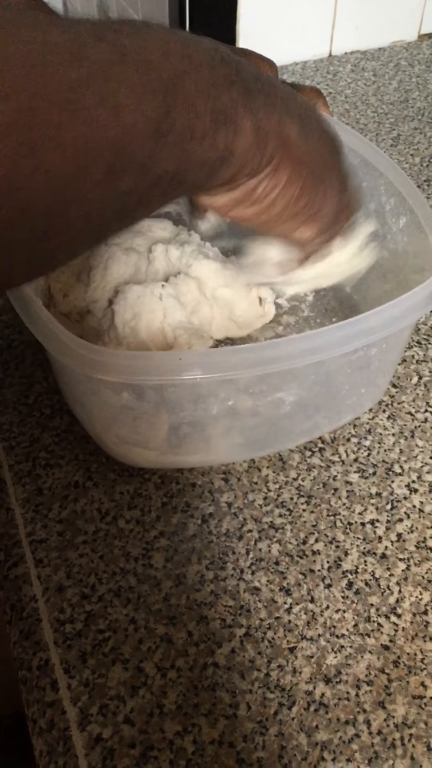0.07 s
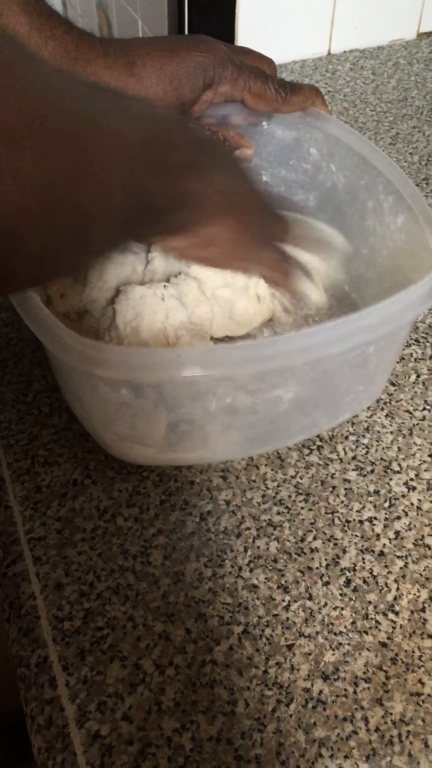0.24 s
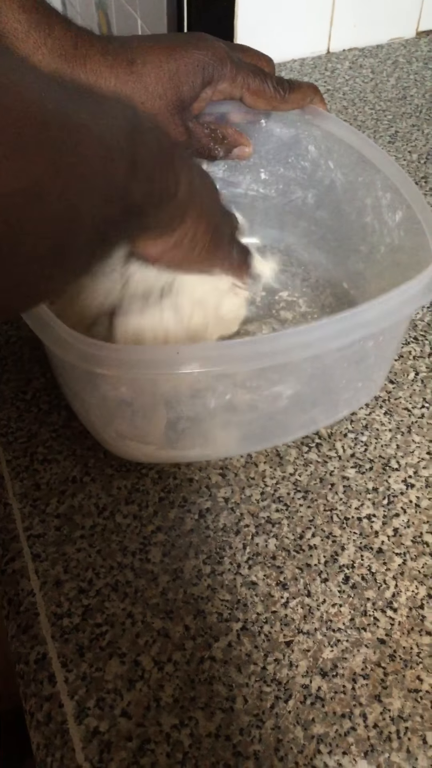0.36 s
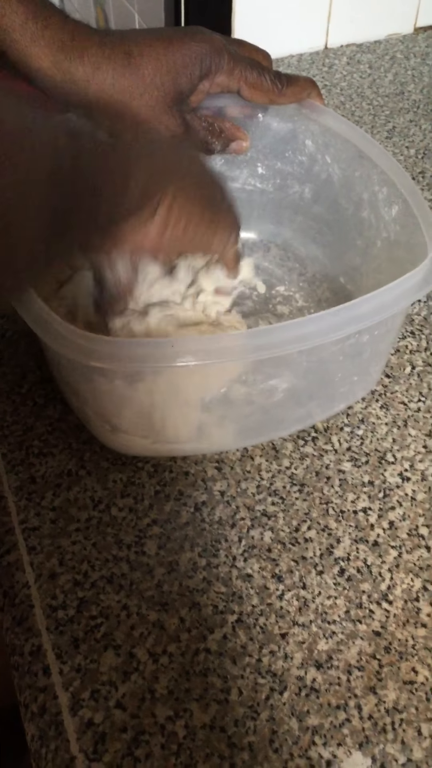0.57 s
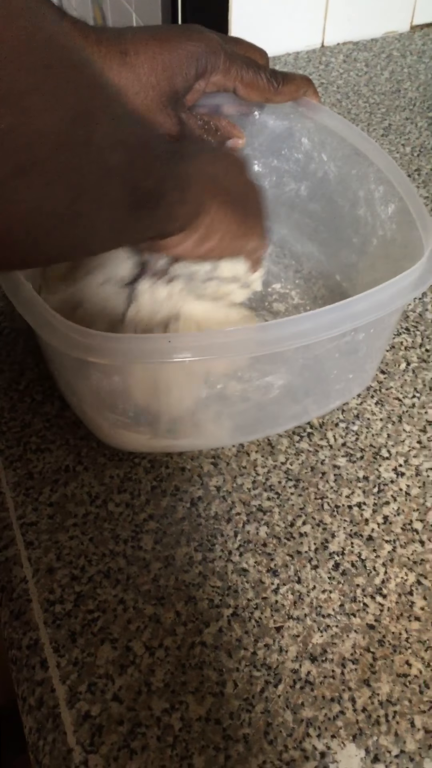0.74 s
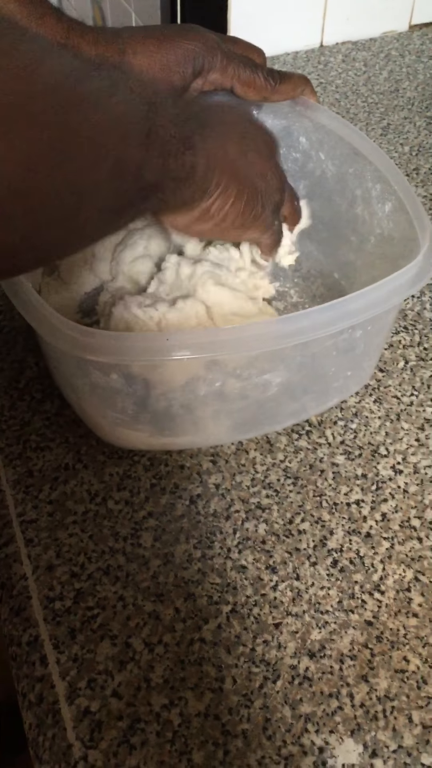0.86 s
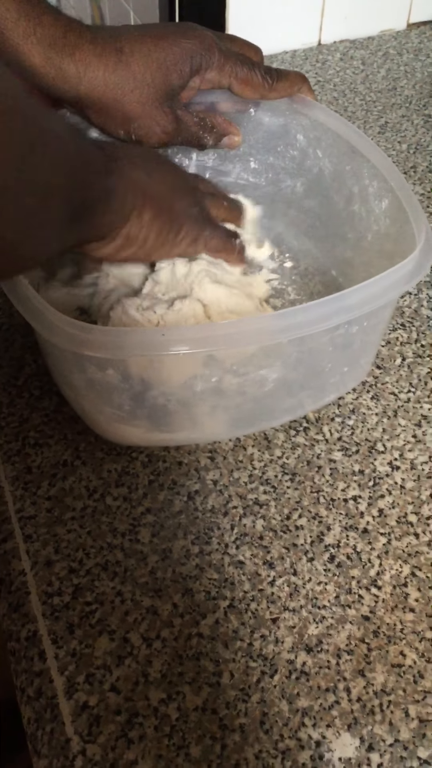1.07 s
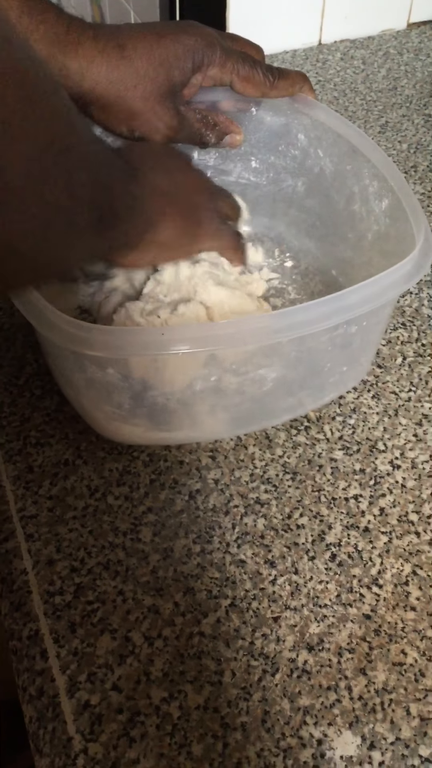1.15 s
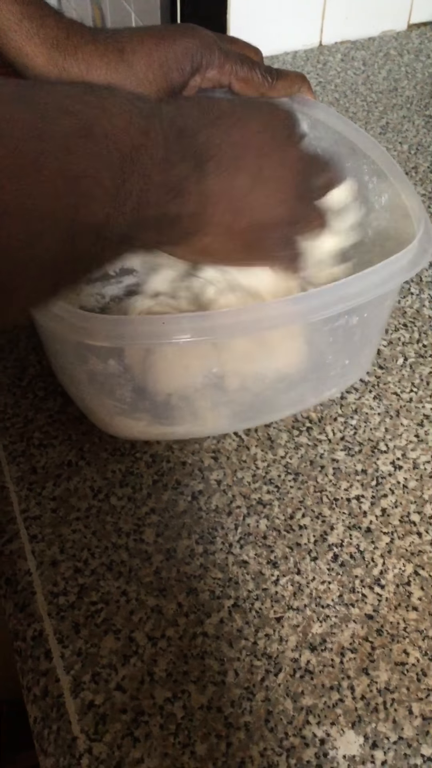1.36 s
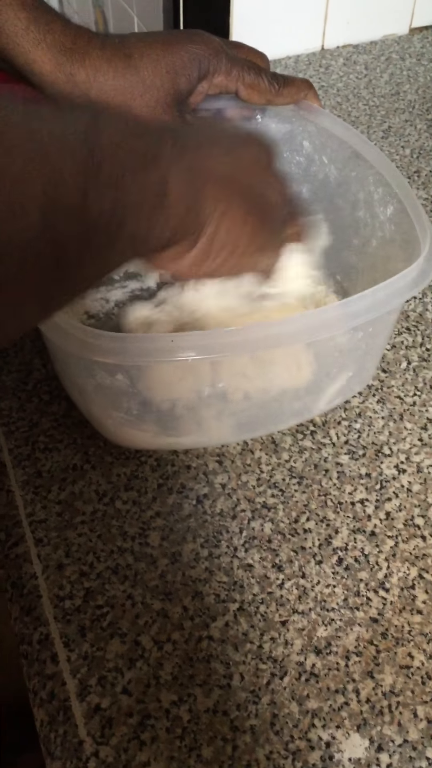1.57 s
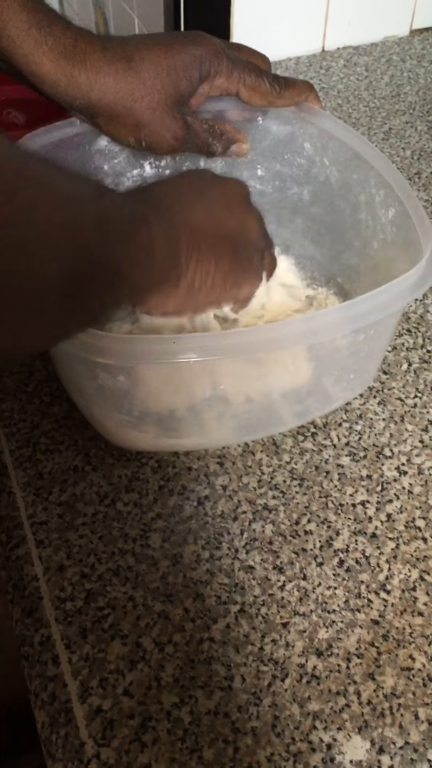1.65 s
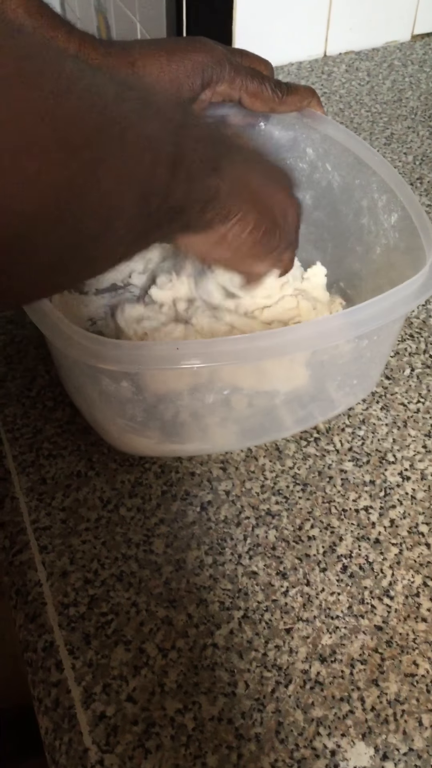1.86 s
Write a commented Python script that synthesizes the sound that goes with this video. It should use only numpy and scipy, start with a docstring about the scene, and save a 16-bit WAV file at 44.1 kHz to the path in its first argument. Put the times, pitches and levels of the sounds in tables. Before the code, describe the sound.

A hand kneads soft dough in a plastic tub, close by, each stroke a soft hiss and scrape. At about 0.25 seconds the tub knocks loudly on the counter, with a dough thud, slap and squish. Light knocks follow until 0.7 seconds as the rubbing continues. Softer thuds and knocks land near 1.05 and 1.5 seconds, the last with a sticky snap. A faint kitchen hum runs underneath.

```python
"""Stone kitchen counter: a hand kneads soft, floury dough in a thin plastic tub. Each stroke drags dough over
the plastic with a fine hiss and a duller scrape. The tub rocks and knocks, ringing its walls and rim, and drops
back onto the counter with a low thud. The dough snaps loose, is slapped by the palm and squishes. A small room
answers the impacts, over a low, steady hum."""
import sys
import numpy as np
from scipy import signal
from scipy.fft import rfft, irfft, next_fast_len
from scipy.io import wavfile
from scipy.ndimage import map_coordinates

SR = 44100
rng = np.random.default_rng(int(sys.argv[2]) if len(sys.argv) > 2 else 0)


def master(y):
    """Save y as 16-bit WAV."""
    cut = np.clip(np.atleast_2d(y).T, -1, 1)
    pcm = np.round(cut * 32767)  # scale
    wavfile.write(sys.argv[1], SR, pcm.astype(np.int16))


N = 83790

# room hum bands: f/Hz, width/Hz, level/dB
HUM_BANDS = [(180.6, 11.3, -65), (293.4, 61, -60.5)]
# room decay: f/Hz, t60/s
ROOM_DECAY = [(100, 0.3), (400, .3), (2000, 0.31), (12000, 0.089)]

# rubbing envelope in five spans, joined smoothly across the short gaps: t/s, hiss level/dB, scrape offset/dB
RUB_SPAN_1 = [(0.0, -53.5, -3), (0.108, -80, 8.5), (0.192, -83, 11), (0.205, -67.5, 7)]
RUB_SPAN_2 = [(0.22, -49.5, -4), (0.236, -49.5, -4), (0.242, -42.5, -1), (0.282, -49, -3), (0.3, -41, -14.5),
              (0.322, -41, -9), (0.352, -48.5, -2), (0.558, -55.5, -2), (0.64, -74, 10), (0.65, -70, 4)]
RUB_SPAN_3 = [(0.675, -53, -8), (0.681, -52.5, -7), (0.723, -52.5, -10), (0.817, -44.5, -8),
              (0.907, -53.5, -1), (0.933, -58.5, -4), (0.995, -75.5, -1)]
RUB_SPAN_4 = [(1.015, -69, -6), (1.031, -54, -3), (1.067, -59.5, 0), (1.107, -50.5, -12.5), (1.127, -42, -11),
              (1.183, -51, -7), (1.273, -56, -3.5), (1.343, -77, 7.5), (1.357, -72.5, 5.5),
              (1.421, -56.5, 1.5), (1.471, -66.5, 4.5), (1.505, -73, 4.5)]
RUB_SPAN_5 = [(1.56, -63.5, 4.5), (1.612, -76, 5), (1.622, -64.5, -3), (1.688, -70.5, 1), (1.752, -53, -9.5),
              (1.814, -59, -10.5), (1.87, -75.5, 7.5), (1.89, -67, -4)]
# tub on counter: t/s, wall level/dB, clack level/dB, wall pitch factor
TUB_KNOCKS = [(.111, -45.5, -55, 1.08), (.211, -24.5, -20, 1.09), (0.244, -15.5, -30.5, 0.967),
              (0.257, -33, -49, 0.944), (.317, -45, -40, 1.03), (.436, -40, -41.5, 0.79),
              (.594, -37, -40, 1.02), (.662, -33.5, -41.5, 0.98), (1.003, -49.5, -45.5, 1.6),
              (1.0507, -35, -61, 1.014), (1.472, -44.5, -51, 1.05), (1.528, -35, -36, 0.88),
              (1.614, -46.5, -46.5, 1.12), (1.643, -45, -43, 0.9), (1.669, -40.5, -47, 0.96)]
# dough and tub impacts: t/s, level/dB
DOUGH_SNAPS = [(.038, -49), (.243, -30.5), (1.5267, -36), (1.6237, -51)]
TUB_THUDS = [(0.115, -46), (0.249, -31), (.256, -26), (0.29, -38), (0.443, -46), (0.606, -45),
             (0.684, -47), (1.035, -34.5), (1.05, -33.5), (1.107, -49), (1.533, -43), (1.544, -39)]
PALM_SLAPS = [(.245, -34), (1.050, -41.5), (1.528, -47)]
DOUGH_SQUISHES = [(.3145, -36), (1.128, -47), (1.530, -51)]

# tub modes: f/Hz, relative level/dB, t60/s
WALL_MODES = [(275, -5, 0.053), (340, -4, 0.036), (365.3, -3.5, 0.053), (415, -10, 0.062), (576, -5, 0.039),
              (557, -11, 0.041), (620, -10, 0.021), (660, -31, 0.049)]
RIM_MODES = [(668, -11, 0.064), (1100, -21, 0.043), (1416, -14.5, 0.056), (1669, -11.5, .06),
             (2003, -29, 0.04), (2154, -11, 0.046), (2600, -8, 0.011), (3230, -15, 0.019)]
BOTTOM_MODES = [(105.3, -3.5, 0.044), (136.4, -3.5, 0.051), (185, -3.5, 0.12), (252, -12, 0.043)]
# noise spectra: f/Hz, relative level/dB
AIR_SPECTRUM = [(25, -42), (55, -21), (75, -47), (110, 1), (220, 0.5), (370, 4), (450, 1.5), (650, -6),
                (900, -10.5), (1600, -11), (2700, -14.5), (6000, -20.5), (15500, -29.5)]
HISS_SPECTRUM = [(200, 2), (900, -28.5), (2000, -1.5), (3000, 0.5), (4500, 1), (6300, 2.5), (9500, 0),
                 (12300, 0.5), (15500, -3.5)]
SCRAPE_SPECTRUM = [(60, -26), (130, -16), (330, -4), (450, -9.5), (620, 7), (810, -8.5), (1000, 1.5),
                   (1300, -1), (1900, 1.5), (3200, -2.5), (6000, -10.5), (15000, -37)]
SNAP_SPECTRUM = [(300, -7), (1500, 4.5), (5000, 5), (7500, -1), (10000, -10), (15000, -9)]
CRACK_SPECTRUM = [(100, -32), (300, -8), (620, 7), (820, -18), (1100, 2.5), (2200, -3), (3500, -11),
                  (7000, -25.5), (15000, -30)]
SLAP_SPECTRUM = [(150, -17), (420, 5.5), (650, -11), (950, -3), (1300, -6), (2000, -25), (8000, -48)]
SQUISH_SPECTRUM = [(400, -17), (650, 13), (1200, -17), (2200, -1), (3000, 14), (4000, -9), (5700, 15.5),
                   (8500, -10), (12000, 3), (15000, -19)]


def amp(db):
    """dB to gain."""
    return 10 ** (np.asarray(db) / 20)


def unit(x):
    """Scale to rms 1."""
    return x / np.sqrt(np.mean(x ** 2) + 1e-20)


def along(points, hz):
    """Interpolate (f/Hz, value) points on a log axis."""
    points_hz, values = np.transpose(points)
    return np.interp(np.log(hz + 1), np.log(points_hz + 1), values)


def filtered(x, response):
    """FFT filter with gain response(hz)."""
    size = next_fast_len(len(x) + SR // 4)
    return irfft(rfft(x, size) * response(np.fft.rfftfreq(size, 1 / SR)), size)[:len(x)]


def coloured(x, spectrum):
    """Shape by a spectrum; rms 1."""
    return unit(filtered(x, lambda hz: amp(along(spectrum, hz))))


def add(track, start_s, sound):
    """Mix in place."""
    part = track[max(0, round(start_s * SR)):][:len(sound)]
    part += sound[:len(part)]


def fade(t, t60_s):
    """Exponential decay."""
    return np.exp(-np.log(1000) * t / t60_s)


def ring(modes, attack_s, pitch=1, spread_s=0.00025, scatter_db=0.5):
    """Damped modes; onsets and levels vary per contact."""
    t, out = np.arange(SR // 4) / SR, 0
    for hz, db, t60_s in modes:
        age_s = np.maximum(t - spread_s * rng.random(), 0)
        gain = amp(db + scatter_db * rng.normal())
        envelope = fade(age_s, t60_s) * (1 - np.exp(-age_s / attack_s))
        out = out + gain * envelope * np.sin(2 * np.pi * hz * pitch * age_s)
    return out


def burst(spectrum, t60_s):
    """Decaying noise puff."""
    t = np.arange(SR // 4) / SR
    return coloured(rng.standard_normal(len(t)), spectrum) * fade(t, t60_s)


def near_walls(x, count=6, span_s=0.006, echo_db=-16.5):
    """Early reflections off tub sides and tiles: boxy colour."""
    out = x.copy()
    for delay_s in span_s * rng.uniform(0.1, 1, count):
        add(out, delay_s, amp(echo_db) * x)
    return unit(out)


def in_kitchen(events, tail_db=-11.5, delay_s=0.012):
    """Mix (t/s, sound) events, each with its own room tail."""
    out = np.zeros(N)
    for start_s, sound in events:
        hz, t, noise = signal.stft(rng.standard_normal(SR // 2), SR, nperseg=256)
        decay = fade(t, along(ROOM_DECAY, hz)[:, None])
        _, tail = signal.istft(noise * decay, SR, nperseg=256)
        response = np.pad(amp(tail_db) * tail / np.linalg.norm(tail), (1 + int(delay_s * SR), 0))
        response[0] = 1  # direct path
        add(out, start_s, signal.fftconvolve(sound, response))
    return out


def room_tone(air_db=-61):
    """Soft air noise plus a fuzzy, narrow-band hum."""
    out = amp(air_db) * coloured(rng.standard_normal(N), AIR_SPECTRUM)
    for centre_hz, width_hz, db in HUM_BANDS:
        hum = filtered(rng.standard_normal(N), lambda hz: 1 / (1 + (2 * (hz - centre_hz) / width_hz) ** 2))
        out += amp(db) * unit(hum)
    return out


def friction(spectrum, flutter_db, flutter_hz, slips_per_s=6000, spread_db=2.5, slip_share=0.43):
    """Dense micro-slips of flour and dough under an uneven grip."""
    slips = (rng.random(N) < slips_per_s / SR) * np.sign(rng.normal(size=N))
    slips *= amp(spread_db * np.minimum(rng.exponential(size=N), 5))
    grain = np.sqrt(slip_share) * unit(slips) + np.sqrt(1 - slip_share) * rng.standard_normal(N)
    grip = map_coordinates(rng.standard_normal(SR // 20), [np.arange(N) * flutter_hz / SR])
    return unit(coloured(near_walls(grain), spectrum) * amp(flutter_db * grip))


def rubbing(hiss_trim_db=1, scrape_trim_db=1.5):
    """Dough slides on plastic: bright hiss, duller scrape through the walls."""
    times_s, hiss_db, offset_db = np.concatenate([RUB_SPAN_1, RUB_SPAN_2, RUB_SPAN_3, RUB_SPAN_4, RUB_SPAN_5]).T
    t = np.arange(N) / SR
    hiss = friction(HISS_SPECTRUM, flutter_db=-0.8, flutter_hz=90)
    hiss *= amp(hiss_trim_db + np.interp(t, times_s, hiss_db))
    scrape = friction(SCRAPE_SPECTRUM, flutter_db=1.0, flutter_hz=80)
    scrape *= amp(scrape_trim_db + np.interp(t, times_s, hiss_db + offset_db))
    return hiss + scrape


def snaps():
    """Sticky dough snaps off the plastic."""
    return [(s, amp(db) * burst(SNAP_SPECTRUM, t60_s=0.0084)) for s, db in DOUGH_SNAPS]


def knocks(crack_db=-6):
    """Tub hits counter: walls ring, the stiff rim clacks."""
    events = []
    for s, wall_db, clack_db, pitch in TUB_KNOCKS:
        rim = ring(RIM_MODES, attack_s=0.0016)
        crack = amp(crack_db) * burst(CRACK_SPECTRUM, t60_s=0.03)
        wall = ring(WALL_MODES, attack_s=0.002, pitch=pitch)
        events.append((s, amp(wall_db) * wall + amp(clack_db) * (rim + crack)))
    return events


def thuds():
    """The tub drops onto the counter; its bottom rings low."""
    return [(s, amp(db) * ring(BOTTOM_MODES, attack_s=0.0013)) for s, db in TUB_THUDS]


def slaps():
    """Palm hits soft dough."""
    return [(s, amp(db) * burst(SLAP_SPECTRUM, t60_s=0.036)) for s, db in PALM_SLAPS]


def squishes():
    """Wet pockets in the dough close."""
    return [(s, amp(db) * burst(SQUISH_SPECTRUM, t60_s=0.046)) for s, db in DOUGH_SQUISHES]


def scene():
    """Mono mix; room tail on the impacts only."""
    return (room_tone() + rubbing() + in_kitchen(snaps() + knocks() + thuds() + slaps() + squishes()))[None]


def record(dry):
    """Cut deep bass and extreme treble."""
    low_cut_hz, top_hz = 93.6, 15850
    highpass = signal.butter(8, low_cut_hz, btype="high", fs=SR, output="sos")
    return filtered(signal.sosfilt(highpass, dry[0]), lambda hz: hz < top_hz)[None]


dry = scene()
out = record(dry)
master(out)
```